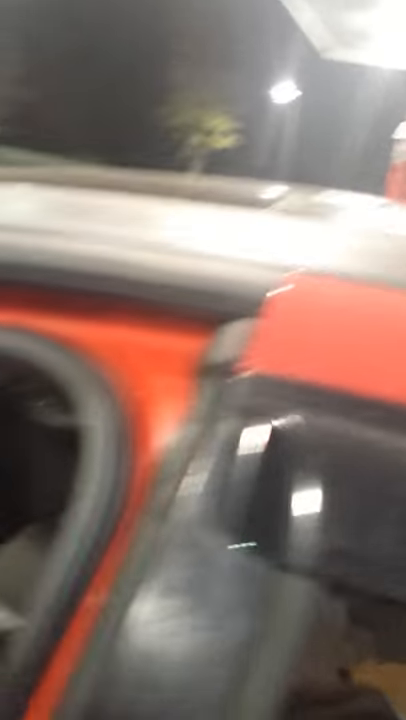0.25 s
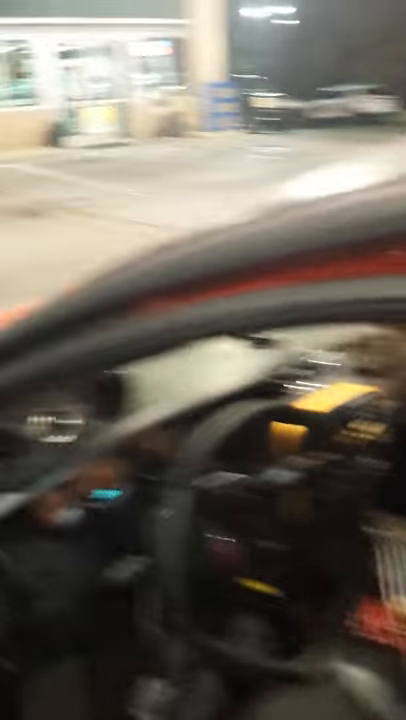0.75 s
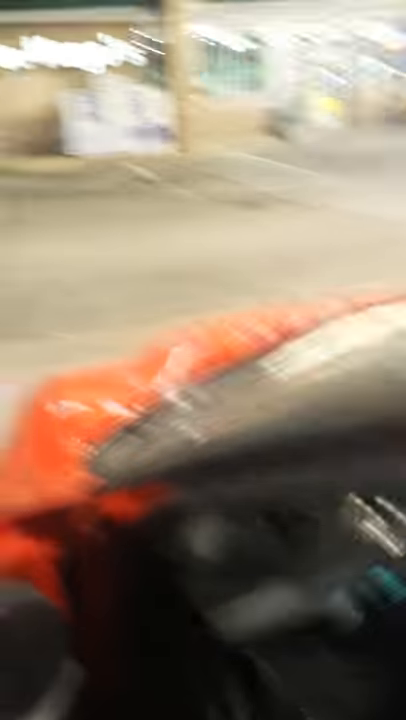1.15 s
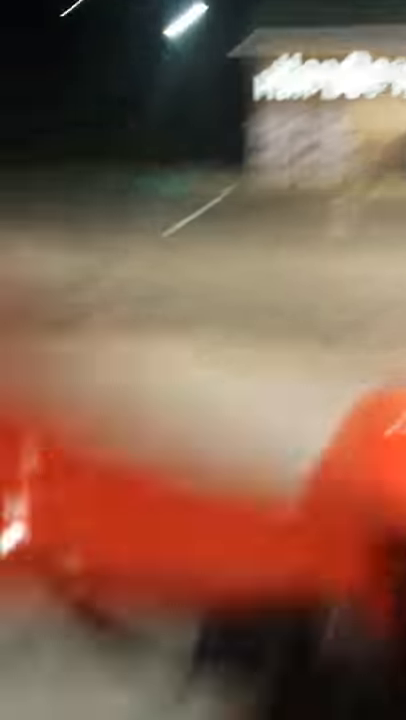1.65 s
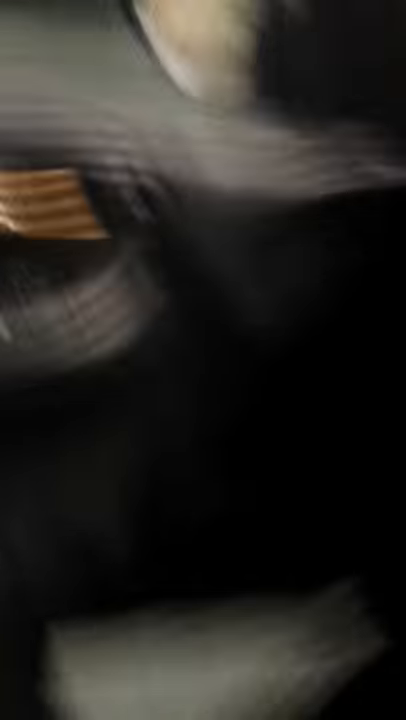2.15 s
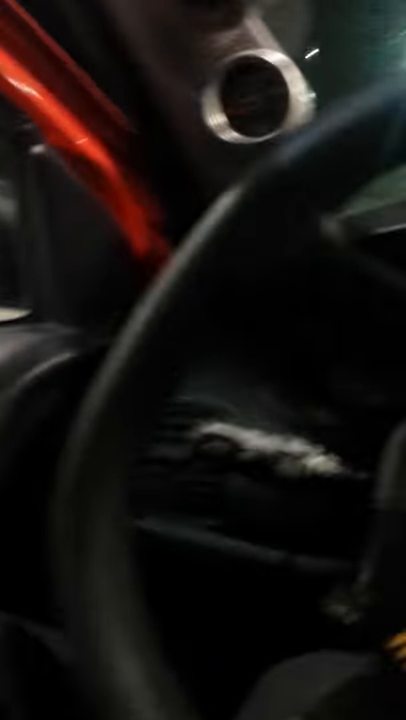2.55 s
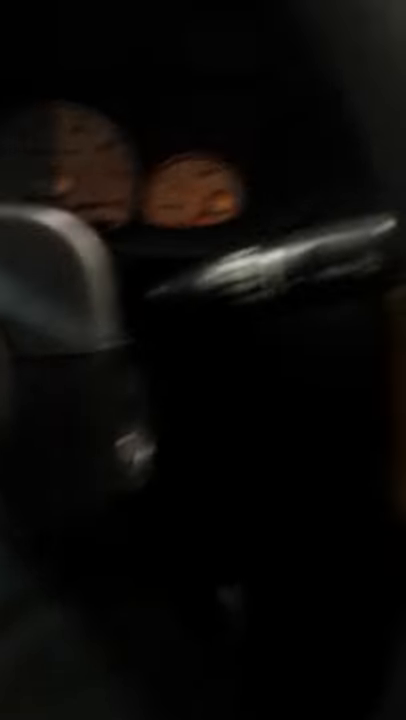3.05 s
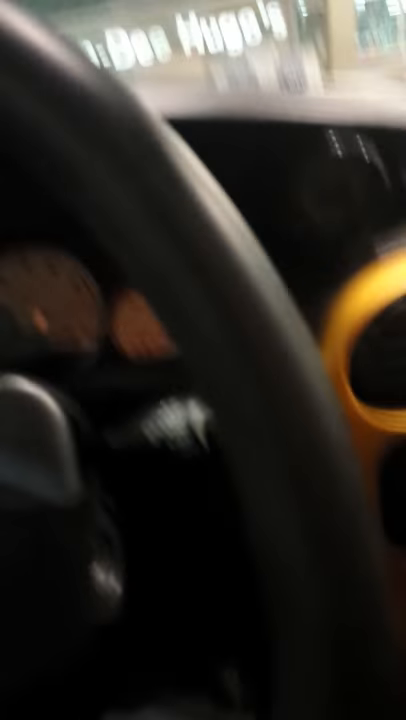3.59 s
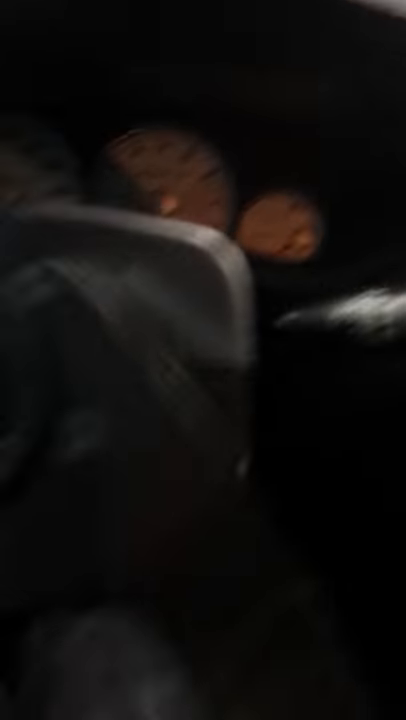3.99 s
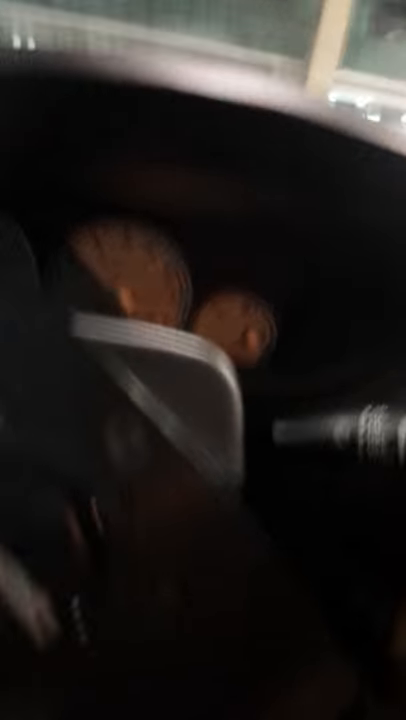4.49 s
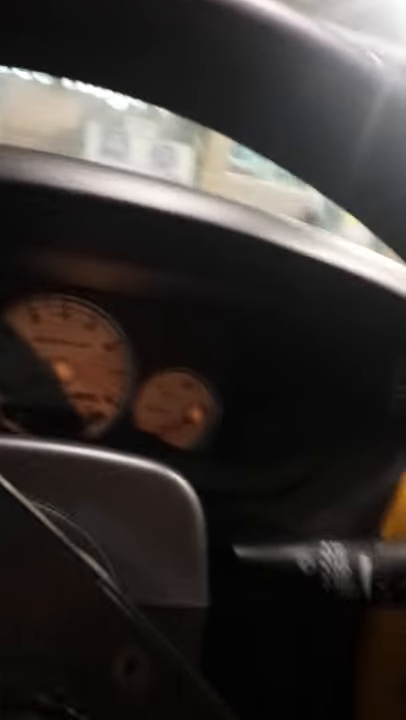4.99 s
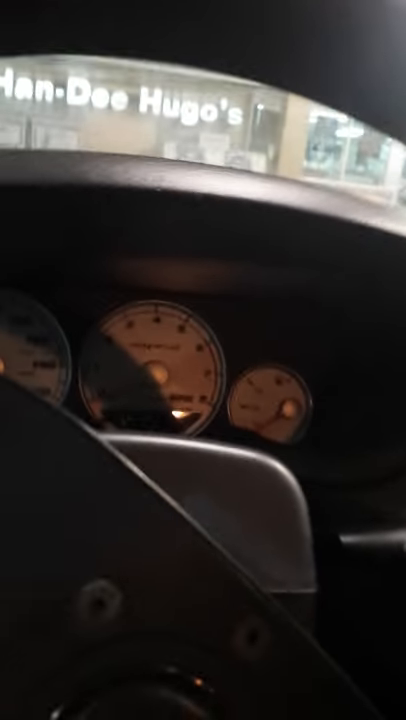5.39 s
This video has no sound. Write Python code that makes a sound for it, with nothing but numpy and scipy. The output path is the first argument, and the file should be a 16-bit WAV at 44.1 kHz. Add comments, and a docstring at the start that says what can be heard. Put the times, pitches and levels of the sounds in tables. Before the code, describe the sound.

Someone gets into a car with rustles and bumps and slams the door, shutting out a low rumble; microphone handling knocks follow.

```python
"""Getting into a car at night

Over a low outdoor rumble a door latch pops, clothes rustle, the seat bumps and a metal fitting clacks.
The door is slammed from inside: its steel skin shakes, the cabin air booms and loose trim rattles.
The outdoor rumble is shut out. Then fingers tap and rub the microphone's casing beside its two
sound holes, the left and right ports."""
import sys
import numpy as np
from scipy import signal
from scipy.fft import rfft, irfft, next_fast_len
from scipy.io import wavfile

SR = 44100
rng = np.random.default_rng(int(sys.argv[2]) if len(sys.argv) > 2 else 0)


def master(y):
    """Save y as 16-bit WAV."""
    cut = np.clip(np.atleast_2d(y).T, -1, 1)
    pcm = np.round(cut * 32767)  # scale
    wavfile.write(sys.argv[1], SR, pcm.astype(np.int16))


N = 248283
TIME = np.arange(N) / SR
SIZE = next_fast_len(N + SR // 2, True) // 2 * 2   # padded length for filtering
BINS = np.arange(SIZE // 2 + 1) * SR / SIZE   # frequencies in Hz
SHUT_S, SHUT_TAKES_S = 4, .1   # when and how fast it gets quiet after the slam
KNOCK_S = 4.692
# tone of a dull scuff on seat or casing: f/Hz, level/dB
SCUFF = [(60, 12), (300, -1), (700, -3.5), (1200, -9), (2000, -10), (3500, -20.5), (9000, -45)]


def amp(db):
    """Turn decibels into a gain."""
    return np.exp(np.asarray(db) / 20 * np.log(10))


def unit(x):
    """Scale a signal to an average power of 1."""
    return x / np.sqrt(np.mean(x ** 2) + 1e-20)


def per_bin(points):
    """Join the points of a table over frequency, on a log axis."""
    hz, value = np.transpose(points)
    return np.interp(np.log(BINS + 1), np.log(hz), value)


def pan(side_db):
    """Left and right gains of constant total power; side_db is left minus right."""
    gains = amp(np.array([[.5], [-.5]]) * side_db)
    return gains / np.sqrt(np.mean(gains ** 2, axis=0))


def colour(x, spectrum):
    """Give a sound the tone in a table; white noise keeps its level."""
    cepstrum = irfft(np.log(unit(amp(per_bin(spectrum)))))
    # minimum phase: nothing rings ahead of the sound that causes it
    cepstrum[1:SIZE // 2] *= 2
    cepstrum[SIZE // 2 + 1:] = 0
    return irfft(rfft(x, SIZE) * np.exp(rfft(cepstrum)))[..., :N]


def stereo_noise():
    """White noise at the two ports: alike in the bass, unrelated in the treble."""
    # how alike the ports sound: f/Hz, correlation
    likeness = [(40, 0.74), (150, 0.89), (400, 0.76), (1000, 0), (3000, 0), (8000, 0.0077)]
    alike = np.clip(per_bin(likeness), -1, 1)
    mid, side = rfft(rng.standard_normal((2, SIZE)))
    mid, side = mid * np.sqrt(1 + alike), side * np.sqrt(1 - alike)
    return unit(irfft(np.array([mid + side, mid - side]))[:, :N])


def flutter(rate, depth_db):
    """A gain that wanders at random, about rate times a second."""
    steps = amp(depth_db * rng.standard_normal(N // 20))
    return np.interp(TIME * rate, np.arange(len(steps)), steps)


def swell(s, rise, t60, hold=0):
    """A loudness curve: climbs 30 dB within rise, peaks at time s, holds, then drops 60 dB in t60."""
    span = slice(max(0, int((s - 3 * rise) * SR)), int((s + hold + 2 * t60) * SR))
    late, envelope = TIME[span] - s, np.zeros(N)
    envelope[span] = amp(np.minimum(30 * late / rise, -60 * np.maximum(late - hold, 0) / t60))
    return envelope


def stroke(s, length):
    """The bell-shaped loudness curve of a sliding move, above half height for its length."""
    return .5 ** np.minimum((2 * (TIME - s) / length) ** 2, 20)


def ramp(s, length):
    """Go from 0 to 1 around time s."""
    return np.clip((TIME - s) / length + .5, 0, 1)


def together(envelopes):
    """Loudness curves of unrelated sounds add in power."""
    return np.sqrt(sum(e ** 2 for e in envelopes))


def ring(x, hz, t60):
    """One mode, a natural note of an object: a click sets off a fading sine wave."""
    decay, angle = np.exp(-np.log(1000) / (t60 * SR)), 2 * np.pi * hz / SR
    return signal.lfilter([0, np.sin(angle)], [1, -2 * decay * np.cos(angle), decay ** 2], x + 1e-18)


def body(force, modes):
    """One force rings all the modes of an object; the energy is kept."""
    ringing = sum(amp(db) * ring(force, hz, t60) for hz, db, t60 in modes)
    return unit(ringing) * np.sqrt(np.mean(force ** 2))


def resonance(x, hz, width_hz):
    """Let through one band of pitches, with gain 1 at its centre."""
    return signal.lfilter(*signal.iirpeak(hz, hz / width_hz, fs=SR), x + 1e-18)


def cabin(x, t60, wet_db):
    """Add dense echoes from glass and trim, soon soaked up by the seats."""
    t = TIME[:SR // 2]
    tail = rng.standard_normal((2, len(t))) * np.exp(-np.log(1000) * t / t60) * (t > .003)
    tail /= np.sqrt(np.sum(tail ** 2, axis=1, keepdims=True))
    return x + amp(wet_db) * signal.fftconvolve(x, tail, axes=1)[:, :N]


def background():
    """Outdoor rumble, shut out in two steps; the rocking car body, a faint hum and a steady hiss."""
    # tone of the rumble: f/Hz, level/dB
    rumble_tone = [(15, -23), (25, 1), (45, -16), (97, -1), (168, -7), (229, -6.5), (382, -14.5),
                   (427, -14.5), (622, -20), (812, -17.5), (1730, -24), (2630, -32), (3750, -27),
                   (5000, -37.5), (6500, -65), (11000, -120)]
    # tone of the hiss: f/Hz, level/dB
    hiss_tone = [(100, -9), (500, -4), (2000, -19.5), (7000, -11), (11000, -23), (16000, -21)]
    # the car rocks on entry, after the slam and as the driver settles: t/s, rise/s, t60/s, level/dB
    rocks = [(2.0, 2.1, 0.69, -36.5), (3.25, .2, 2.0, -36.5), (5.63, .8, .5, -57)]
    # quieter as the microphone moves inside, and again once the door is shut
    outdoors_db = -39.5 - 14 * ramp(2.37, length=.13) - 6 * ramp(SHUT_S, SHUT_TAKES_S)
    rocking = [amp(db) * swell(s, rise, t60) for s, rise, t60, db in rocks]
    jolt = amp(-48) * swell(KNOCK_S, rise=.49, t60=1.55)   # the knock stirs the cabin too
    loudness = together([amp(outdoors_db), jolt] + rocking)
    rumble = loudness * colour(stereo_noise(), rumble_tone) * flutter(rate=20, depth_db=2.5)
    hum = amp(-59.5) * np.sin(2 * np.pi * 124.6 * TIME) * flutter(rate=9, depth_db=2.5)
    hiss = amp(-57.5) * colour(stereo_noise(), hiss_tone)
    return rumble * pan(side_db=-.7) + hum + hiss


def clothes():
    """Fabric catches and slips in fine grains as it slides."""
    # clothes slide over the seat: t/s, length/s, level/dB, left-right/dB
    slides = [(0.273, 0.35, -47.5, -5), (1.17, .2, -42.5, 1), (1.38, .24, -39.5, 6), (1.616, .19, -35, 7),
              (1.832, 0.45, -37.5, 7), (2.121, 0.23, -33, 1), (2.426, 0.1, -38.5, 2),
              (2.61, 0.16, -48.5, 3), (2.89, 0.078, -48.5, 2), (3.44, 0.55, -44, 2),
              (3.865, 0.23, -51.5, 5), (4.725, 0.49, -56, -6), (5.04, 0.094, -47, -2.5)]
    # tone of cloth on the seat: f/Hz, level/dB
    seat_tone = [(710, -9.5), (1200, -7.5), (1620, -9.5), (2230, -11.5), (2460, -5.5), (2920, -8.5),
                 (3460, -5.5), (4290, -5.5), (5200, -2.5), (6730, 0.5), (9990, -10), (14500, -20.5),
                 (15500, -25)]
    # a sleeve reaches for the handle and pulls it: t/s, length/s, level/dB
    reaches = [(.15, .12, -43), (.34, .22, -44)]
    # tone of the sleeve: f/Hz, level/dB
    sleeve_tone = [(2000, -29), (6000, 1), (9000, -5), (12500, -5), (16000, -15)]
    # a jacket brushes close to the right port: t/s, length/s, level/dB
    brushes = [(5.276, 0.063, -41.5), (5.577, 0.37, -43)]
    # tone of the jacket: f/Hz, level/dB
    jacket_tone = [(3000, -17.5), (4200, -9), (6000, -3.5), (7200, 3.5), (8500, -10), (11000, -16.5),
                   (15000, -27)]
    stir = amp(-51 - 7.5 * ramp(SHUT_S, SHUT_TAKES_S)) * pan(side_db=3)   # faint rustle between moves
    moves = [amp(db) * stroke(s, length) * pan(side_db) for s, length, db, side_db in slides]
    grains = flutter(rate=580, depth_db=2) * flutter(rate=43, depth_db=1)
    seat = together([stir] + moves) * colour(unit(stereo_noise() * grains), seat_tone)
    friction = stereo_noise() * grains
    sleeve = together(amp(db) * stroke(s, length) for s, length, db in reaches)
    jacket = together(amp(db) * stroke(s, length) for s, length, db in brushes) * pan(side_db=-6.5)
    return seat + sleeve * colour(friction, sleeve_tone) + jacket * colour(friction, jacket_tone)


def wobble(s, hz):
    """A tone of unsteady pitch that passes through zero at time s."""
    turns = np.cumsum(hz * flutter(rate=350, depth_db=.8)) / SR
    return np.sin(2 * np.pi * (turns - turns[round(s * SR)]))


def seat_bumps():
    """Weight shifts on seat and trim: a bump swings and scuffs, a creak lasts while a part slips."""
    # soft bumps on seat and floor: t/s, level/dB, f/Hz
    bumps = [(.142, -16, 92), (.165, -25, 185), (.419, -25, 94), (.813, -31, 211), (1.252, -28, 234),
             (1.761, -16.5, 176), (1.776, -13.5, 122), (1.809, -23.5, 177), (1.869, -11, 120),
             (2.196, -24.5, 149), (2.284, -13.5, 196), (2.383, -29.5, 160), (2.937, -25.5, 200),
             (3.56, -30.5, 120), (4.851, -31.5, 234), (4.893, -33.5, 237)]
    # creaking slips of seat and trim: t/s, length/s, level/dB, f/Hz
    slips = [(2.943, .018, -36, 397), (3.483, .016, -27.5, 462), (3.609, .016, -31, 456),
             (3.76, .06, -39, 473), (3.834, .013, -36, 465), (4.79, .13, -57, 1210)]
    rise_cycles, t60_cycles = 1.4, 5.3
    weights = [amp(db) * swell(s, rise_cycles / hz, t60_cycles / hz) for s, db, hz in bumps]
    thumps = sum(weight * wobble(s, hz) for weight, (s, _, hz) in zip(weights, bumps))
    scuffs = amp(-15) * colour(together(weights) * stereo_noise(), SCUFF)
    creaks = sum(amp(db) * stroke(s, length) * wobble(s, hz) for s, length, db, hz in slips)
    return cabin((thumps + scuffs + creaks) * pan(side_db=3), t60=.28, wet_db=-9)


def contact(s, hold, rise, t60):
    """The loudness of a blow, then of softer grinding while the parts press on each other."""
    return together([swell(s, rise, t60), amp(-5) * swell(s, rise, t60, hold)])


def door():
    """Each contact shakes the steel skin and sets latch and trim chattering; loose trim rattles on."""
    # the latch opens, the door passes two notches, then meets two catches and the seal:
    # t/s, hold/s, skin level/dB, latch and trim level/dB
    contacts = [(.2935, .003, -18.5, -15.5), (.692, 0.00092, -36, -31), (.803, .002, -37, -45),
                (3.079, .002, -20.5, -25), (3.099, .024, -19.5, -16), (3.149, .045, -18.5, -22)]
    # loose trim rattles after the slam: t/s, rise/s, level/dB
    rattles = [(3.124, .01, -19), (3.166, .006, -19.5), (3.200, .003, -17.5), (3.217, .025, -17),
               (3.298, .025, -24.5), (3.334, .02, -20.5), (3.51, .01, -30.5), (3.592, .014, -33),
               (3.637, .007, -34), (3.678, .02, -39), (3.774, .05, -37), (3.832, .008, -38)]
    # tone of the door skin: f/Hz, level/dB
    skin_tone = [(76, 1.5), (130, -15), (335, -3.5), (674, -7), (749, -6.5), (1070, -17.5), (1190, -12.5),
                 (1350, -23.5), (2200, -21.5), (2860, -19.5), (4840, -120)]
    # modes of the door skin: f/Hz, level/dB, t60/s
    skin_modes = [(172, -7, .2), (319, -1, .18), (372, -4, .1), (440, -7, .15), (514, -4, .2),
                  (603, -6, .18), (658, -8, .18), (745, -4, .12), (905, -14, .12), (1180, -13, .06),
                  (1540, -16, .12)]
    # tone of latch and trim: f/Hz, level/dB
    trim_tone = [(530, -33), (900, -32.5), (1050, -1.5), (1880, -7), (2540, -6.5), (3340, -5.5), (3850, -6),
                 (5000, -6), (5500, -3), (7060, -2.5), (7960, -7.5), (9290, -13), (15500, -30)]
    shiver = amp(-26.5) * swell(3.23, rise=.013, t60=.42)
    loose = together([shiver] + [amp(db) * swell(s, rise, t60=.059) for s, rise, db in rattles])
    skin_hits = [amp(db) * contact(s, hold, rise=.003, t60=.15) for s, hold, db, _ in contacts]
    trim_hits = [amp(db) * contact(s, hold, rise=.0018, t60=.062) for s, hold, _, db in contacts]
    force = together([amp(-9) * loose] + skin_hits) * stereo_noise()   # rattles reach the skin weakly
    skin = amp(-.5) * colour(force, skin_tone) + amp(-7) * body(force, skin_modes)
    grit = unit(stereo_noise() * flutter(rate=700, depth_db=1.5))
    chatter = colour(together([loose] + trim_hits) * grit, trim_tone)
    return cabin(skin + chatter, t60=.36, wet_db=-11) * pan(side_db=2)


def small_parts():
    """Small parts buzz around one pitch each when jolted; one squeaks."""
    # jolts to parts of door, sill and seat frame: t/s, t60/s, level/dB, f/Hz
    jolts = [(0.293, 0.054, -18.5, 2900), (.306, 0.051, -15, 348), (.692, 0.031, -22, 1105),
             (1.695, .07, -22.5, 850), (1.758, .07, -35, 1050), (2.056, .045, -20, 620),
             (2.056, .05, -19, 2500), (2.064, .1, -17, 1010), (3.102, .09, -23.5, 1260),
             (3.199, 0.23, -21, 3160)]
    # one thin, high squeak: t/s, length/s, level/dB, f/Hz, width/Hz
    thin_squeak = [(1.885, .02, -30, 12600, 500)]
    width_share = .33   # a buzz's band is this wide compared with its pitch
    noise = stereo_noise()
    buzzes = [(amp(db) * swell(s, rise=.0034, t60=t60), hz, width_share * hz) for s, t60, db, hz in jolts]
    squeaks = [(amp(db) * stroke(s, length), hz, width) for s, length, db, hz, width in thin_squeak]
    parts = sum(envelope * unit(resonance(resonance(noise, hz, width), hz, width))
                for envelope, hz, width in buzzes + squeaks)
    return parts * pan(side_db=2.5)


def near_echo(x):
    """One echo from a hard surface close by colours the sound differently at each port."""
    # the echo at the left port, then the right: delay/s, level/dB
    echoes = [(0.001453, -1), (0.0013, -6)]
    return np.array([side + amp(db) * np.interp(TIME - delay, TIME, side, left=0)
                     for side, (delay, db) in zip(x, echoes)])


def metal_clacks():
    """Metal chatters for a moment on contact; each blow of the fitting leaves a faint jingle."""
    # small metal parts tick: t/s, t60/s, level/dB, left-right/dB
    touches = [(1.313, .04, -39, 3), (1.5365, .008, -20, 7), (1.833, .03, -39, 2), (2.349, .022, -36.5, -1),
               (2.407, .02, -38, -4), (2.693, .04, -44, 0), (2.820, .05, -34, -3), (2.9734, .025, -37, 6),
               (3.374, .07, -36, 2), (3.424, .033, -37, -2), (3.468, .027, -40, 4), (4.871, .05, -40, 1),
               (4.892, .06, -29, -9), (5.282, .021, -33, 0)]
    # a fitting lands edge first, slaps down and bounces twice: t/s, rise/s, level/dB, left-right/dB
    landings = [(2.0523, .0003, -13.5, -8), (2.056, 0.0047, -7, 8), (2.104, .014, -14, 0),
                (2.142, 0.012, -22, 0)]
    # tone of the metal: f/Hz, level/dB
    metal_tone = [(290, -64), (500, -15), (657, -24), (781, -18.5), (901, -12), (1750, -25), (2230, -15.5),
                  (3100, -15.5), (3480, -14.5), (3960, -15), (6360, -4), (9110, -16.5), (11000, -25),
                  (15500, -36)]
    # modes of the fitting: f/Hz, level/dB, t60/s
    metal_modes = [(906, -7, .13), (1057, -8, .1), (2272, -15, .11), (2455, -17, .1), (2935, -12, .09),
                   (3413, -13, .05), (3833, -14, .08), (4594, -3, .06), (5644, -4, .09), (5805, -5, .08),
                   (5960, -4, .09), (6180, -4, .08), (6288, -2, .09), (6946, -5, .08), (7170, -1, .09),
                   (8441, -14, .06), (9453, -19, .06)]
    ticks = [amp(db) * swell(s, rise=.0008, t60=t60) * pan(side_db) for s, t60, db, side_db in touches]
    blows = [amp(db) * (swell(s, rise, t60=.03) + amp(-21.5) * swell(s, rise, t60=.13)) * pan(side_db)
             for s, rise, db, side_db in landings]
    force = together(blows + ticks) * unit(stereo_noise() * flutter(rate=1800, depth_db=3.5))
    metal = amp(3) * colour(force, metal_tone) + amp(-16.5) * body(force, metal_modes)
    return cabin(near_echo(metal), t60=.17, wet_db=-24)


def cabin_boom():
    """The closing door pushes on the cabin air, which booms and reaches the right port first."""
    # pushes of air: t/s, level/dB
    pushes = [(3.121, -22), (3.148, -9), (3.178, -16)]
    # modes of the cabin air: f/Hz, level/dB, t60/s
    air_modes = [(48, -17, 0.29), (63.7, -6, 0.2), (105, -8.5, 0.35), (129.4, -0.5, 0.24),
                 (171, -15, 0.065), (184, -18, 0.2), (328, -29, 0.11)]
    left_delay_s = .00036
    pressure = np.zeros(N)
    for s, db in pushes:
        pressure[round(s * SR)] = amp(db)
    swing = sum(amp(db) * ring(pressure, hz, t60) for hz, db, t60 in air_modes)
    return np.array([np.interp(TIME - left_delay_s, TIME, swing), swing])


def fingers():
    """Touches travel through the casing to the nearer port: dry ticks, dead thuds, rubbing, a knock."""
    # finger taps: t/s, thud level/dB, thud f/Hz, tick level/dB, left-right/dB
    taps = [(4.1352, -12, 780, -27, -19), (4.157, -27, 514, -44, -10), (4.1676, -24.5, 620, -25, -26),
            (4.198, -35, 860, -26.5, -25), (4.246, -31.5, 470, -35, -17), (4.478, -36, 590, -15.5, -24),
            (4.522, -25, 600, -21, 15), (4.542, -26, 260, -8.5, 18), (4.559, -16, 205, -20.5, 34),
            (4.573, -18, 235, -32, 22), (4.606, -18.5, 320, -40, 28), (5.111, -39, 680, -39, -14)]
    # tone of a tick: f/Hz, level/dB
    tick_tone = [(300, 4.5), (1500, -0.5), (3500, -2), (5500, -3.5), (7500, -4.5), (10000, -23),
                 (16000, -33)]
    # fingers slide: t/s, length/s, squeak level/dB, scuff level/dB, left-right/dB
    rubs = [(4.259, 0.015, -33, -31, -26), (4.4, 0.039, -45, -29.5, -20), (4.533, 0.042, -40.5, -31, 17),
            (4.577, 0.02, -40, -41, 0), (4.606, 0.021, -57, -29, 31), (4.695, .007, -30, -16, 16)]
    # tone of a squeaky slip: f/Hz, level/dB
    squeak_tone = [(500, -1), (1500, -3), (3500, -1.5), (5500, 0), (7800, 2.5), (10000, -17), (15000, -34)]
    thud_t60_cycles = 9.6
    thuds, ticks, slips, scuffs = 0, 0, 0, 0
    for s, thud_db, hz, tick_db, side_db in taps:
        envelope = amp(thud_db) * swell(s, rise=.0006, t60=thud_t60_cycles / hz)
        thuds += envelope * np.sin(2 * np.pi * hz * (TIME - s)) * pan(side_db)
        ticks += amp(tick_db) * swell(s, rise=.00059, t60=.0072) * pan(side_db)
    for s, length, squeak_db, scuff_db, side_db in rubs:
        move = stroke(s, length) * pan(side_db)
        slips += amp(squeak_db) * move
        scuffs += amp(scuff_db) * move
    friction = rng.standard_normal((2, N))
    rubbing = colour(slips * friction[0], squeak_tone) + colour(scuffs * friction[1], SCUFF)
    ticking = colour(ticks * rng.standard_normal(N), tick_tone)
    stiff_casing = signal.butter(3, 161, "high", fs=SR, output="sos")   # passes no deep bass
    return signal.sosfilt(stiff_casing, thuds + ticking + rubbing + knock())


def knock():
    """A firm knock by the left port bends the casing with a thump and makes the plastic ring."""
    # modes of the casing: f/Hz, level/dB, t60/s
    casing_modes = [(570, -4, .03), (1344, -1.5, 0.01), (1520, -3, .018), (1970, -2, 0.013),
                    (2380, -11, 0.017)]
    sag_octaves_per_s = 110   # the pitch falls as the fingertip flattens
    pitch_hz = 450 * 2 ** np.clip(-sag_octaves_per_s * (TIME - KNOCK_S), -2, 1)
    turns = np.cumsum(pitch_hz) / SR
    hit = round(KNOCK_S * SR)
    swing = np.sin(2 * np.pi * (turns - turns[hit]))
    thump = amp(-10) * swell(KNOCK_S, rise=.005, t60=.012, hold=.008) * swing
    blow = np.zeros(N)
    blow[hit] = 1
    plastic = sum((-1) ** k * amp(db) * ring(blow, hz, t60)
                  for k, (hz, db, t60) in enumerate(casing_modes))
    return (thump + amp(-6.5) * plastic) * pan(side_db=28)


def scene():
    """Everything as it reaches the two ports."""
    return (background() + clothes() + door() + small_parts() + cabin_boom()
            + metal_clacks() + seat_bumps() + fingers())


def record(dry):
    """The ports colour the sound; the deepest bass, the tallest peaks and the top treble are cut."""
    # resonances of the ports: f/Hz, width/Hz, level/dB
    port_modes = [(2670, 220, -0.5), (4200, 230, 0.5), (6140, 170, -1), (7400, 350, 1)]
    # the right port hears more top treble, the left a little more below it: f/Hz, left-right/dB
    balance = [(150, 1), (500, 1.5), (1000, -0.6), (2000, 0), (4500, 1), (6500, 2), (8000, -6.5),
               (12000, -3.5)]
    heard = dry + sum((amp(db) - 1) * resonance(dry, hz, width) for hz, width, db in port_modes)
    heard = irfft(rfft(heard, SIZE) * pan(per_bin(balance)))[:, :N]
    heard = signal.sosfilt(signal.butter(4, 36, "high", fs=SR, output="sos"), heard)
    heard = np.clip(heard, -.75, .75)
    return signal.sosfilt(signal.cheby2(16, 90, 16500, "low", fs=SR, output="sos"), heard)


dry = scene()
out = record(dry)
master(out)
```